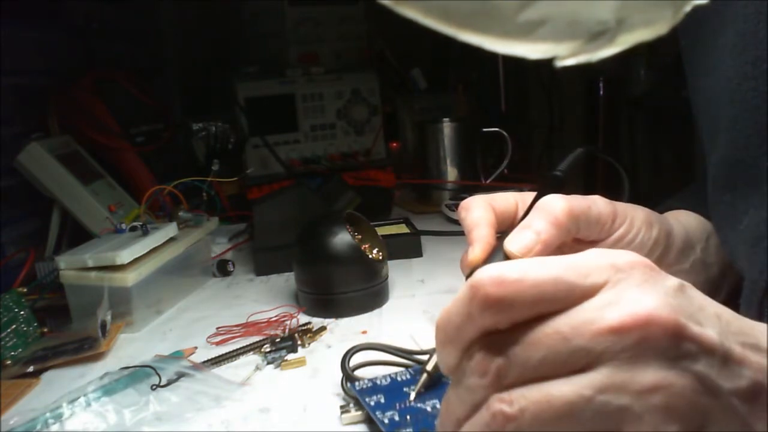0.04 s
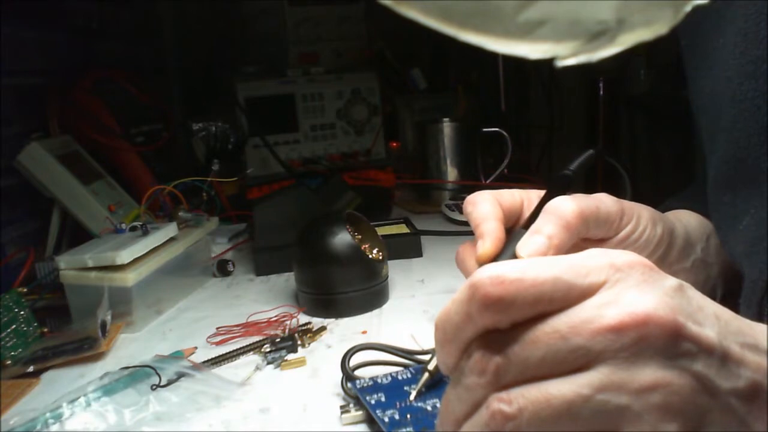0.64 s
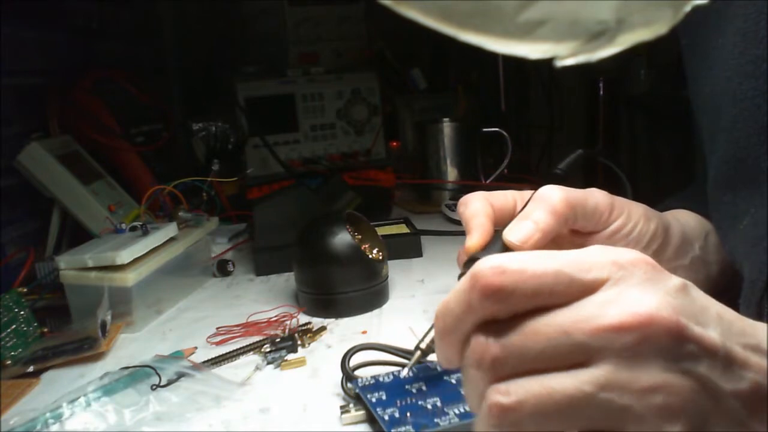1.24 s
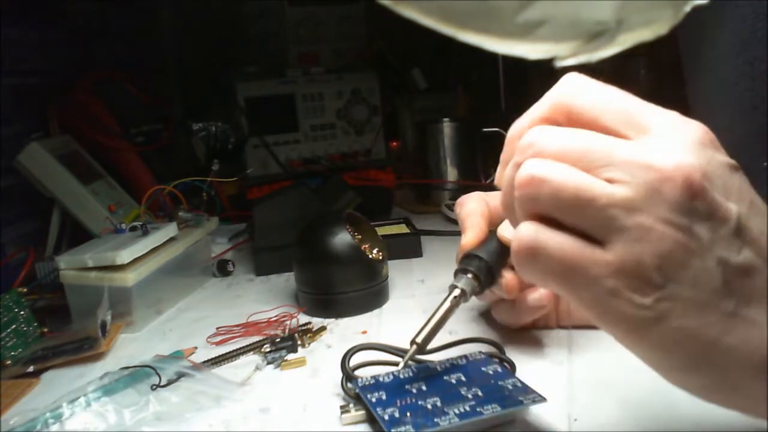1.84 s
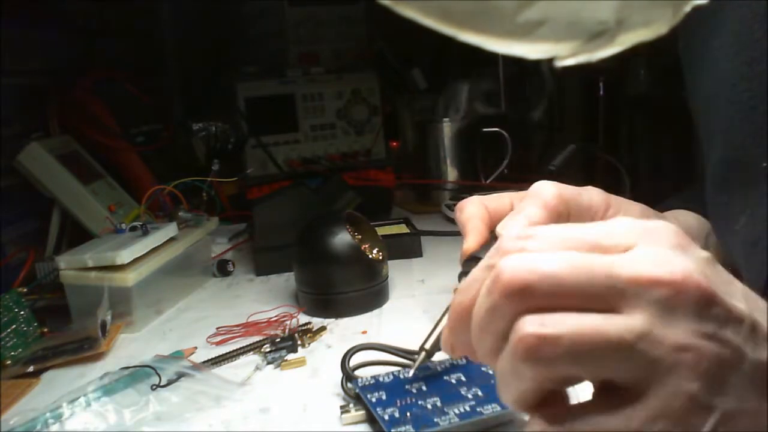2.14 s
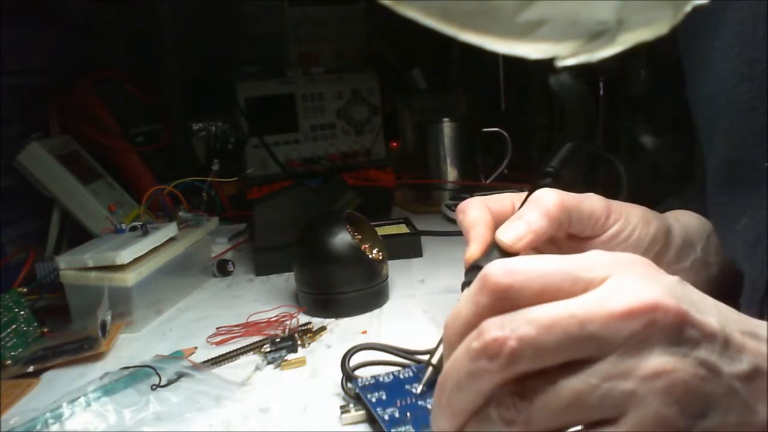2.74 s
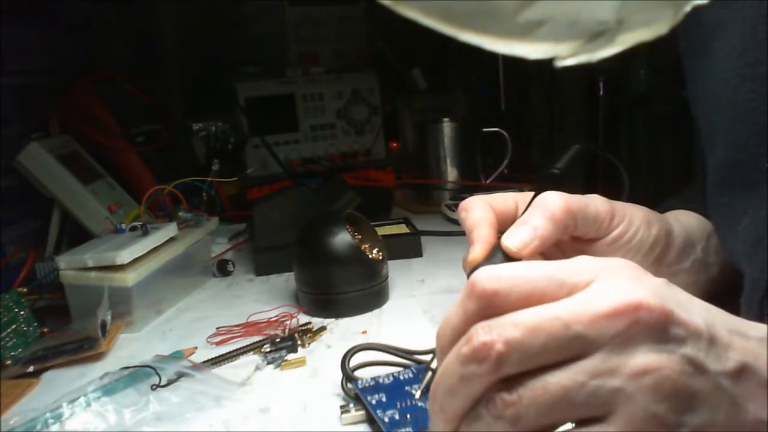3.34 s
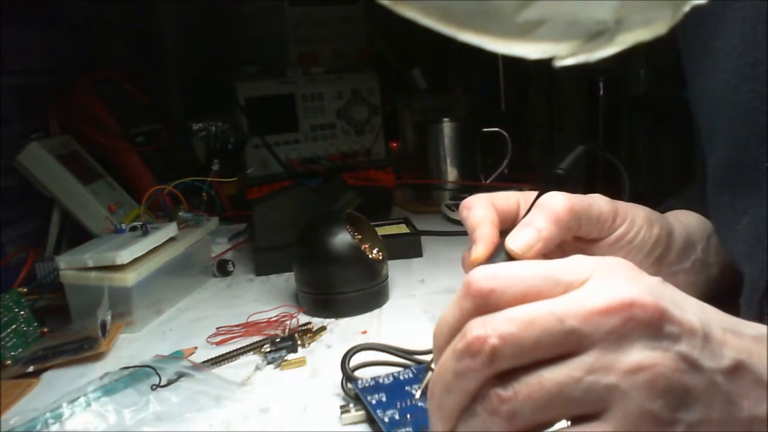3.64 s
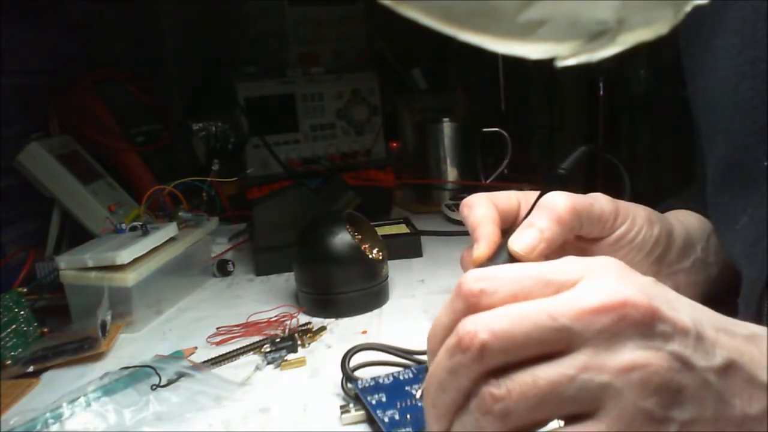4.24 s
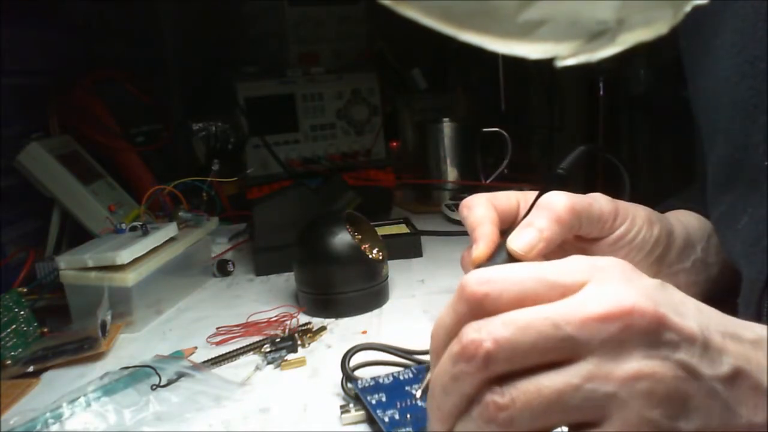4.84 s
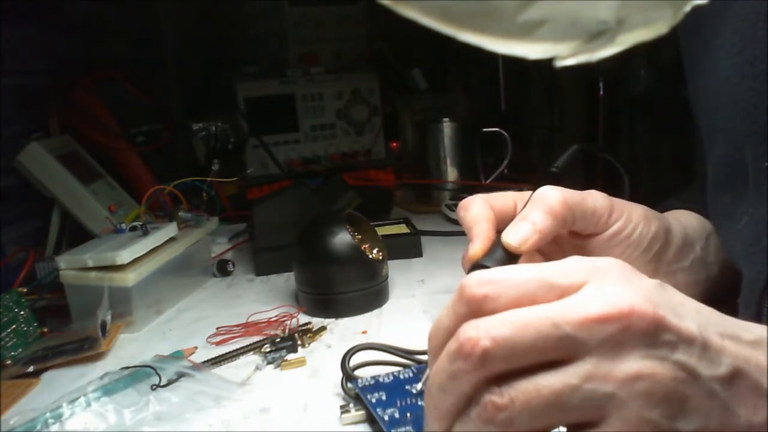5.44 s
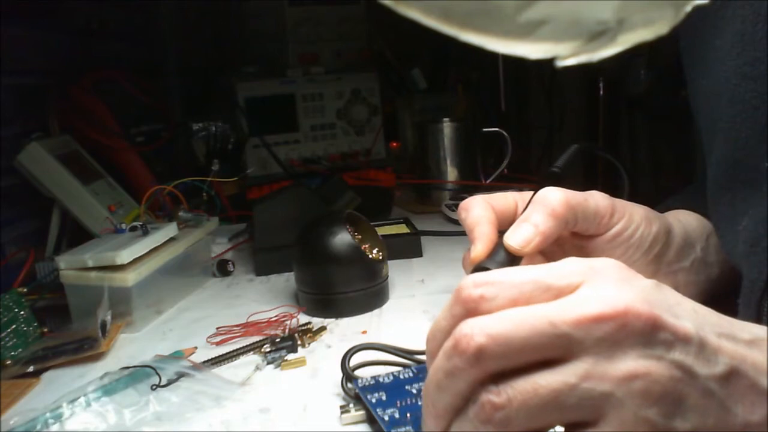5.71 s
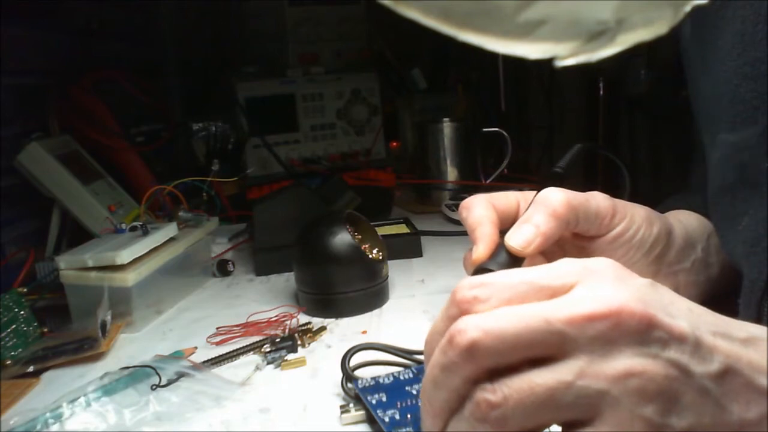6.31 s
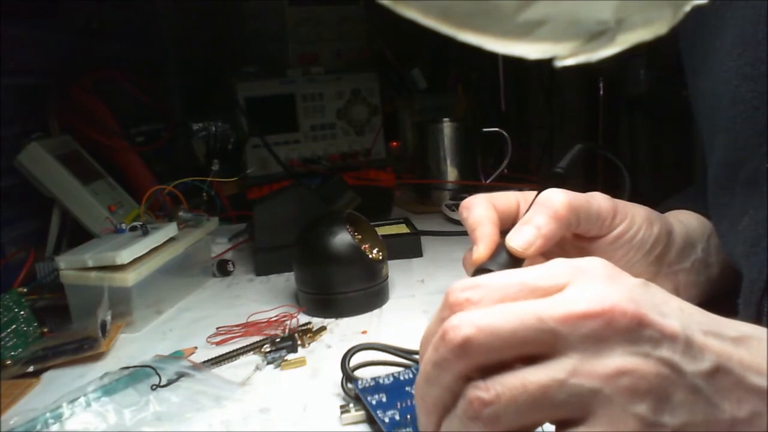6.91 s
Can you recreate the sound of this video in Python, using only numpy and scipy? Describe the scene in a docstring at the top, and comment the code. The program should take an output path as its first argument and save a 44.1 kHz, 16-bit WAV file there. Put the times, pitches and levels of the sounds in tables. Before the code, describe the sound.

A small extractor fan runs throughout at a soldering bench, a dark rush of air with a wavering hum and low rumble. Early on, small parts click, and a hand brushes the bench and bumps it with a dull thud. Afterwards the iron's tip makes faint, brief scrapes and thin squeaks on a circuit board, returning near the end. One close microphone adds a light hiss.

```python
"""A small extractor fan drones over a soldering bench: air roars in its housing, motor and blades hum,
and the unbalanced rotor shakes out a low note that sags. Flux simmers faintly as the joint heats.
The iron's tip sticks and slips on the circuit board in scrapes, squeaks and chirps; small parts tick,
and a hand brushes over the bench and bumps it. One close microphone with a steady hiss."""
import sys
import numpy as np
from scipy import signal
from scipy.fft import rfft, irfft
from scipy.io import wavfile

SR = 44100
rng = np.random.default_rng(int(sys.argv[2]) if len(sys.argv) > 2 else 0)


def log_audio(samples):
    """Write samples as a 16-bit WAV file to the path given in sys.argv[1]."""
    # one column per channel
    frames = np.atleast_2d(samples).T
    # limit to full scale, then quantise
    limited = np.clip(frames, -1, 1)
    pcm = np.round(limited * 32767).astype(np.int16)
    wavfile.write(sys.argv[1], SR, pcm)


N = 316197
TIME = np.arange(N) / SR
FREQS = np.maximum(np.arange(N // 2 + 1) * SR / N, 1)

# The dark roar of air through the fan. Each row: frequency in Hz, relative level in dB.
AIR_SPECTRUM = [(15, -7.5), (60, -0.5), (130, -2), (260, 2.18), (285, -3.5), (346, -3.5), (372, -12.5),
                (645, -13.5), (700, -21.5), (1130, -22), (1480, -29), (2400, -34), (3500, -39),
                (9000, -56.5)]
# Resonances of room, housing and duct. Each row: centre in Hz, width in Hz, lift in dB.
HOUSING_RESONANCES = [(20.5, 11, 13.5), (77.8, 9, 5), (96.2, 7, 4.5), (121.8, 12.6, 7), (158.3, 6.5, 6),
                      (316.4, 10.6, 6.5), (339.2, 12, 4.5), (461, 35, 4), (578, 29, 5), (854, 124, 3.5),
                      (1013, 196, 7.5), (1201, 13, 6.5), (1252, 14, 7), (1318, 28, 10), (1450, 20, 3.5),
                      (1608, 66, 6.5), (1687, 23, 6), (1840, 12, 7.5), (1920, 24, 10), (2095, 59, 6.5),
                      (2210, 19, 9.5), (2360, 22, 3), (2363, 34, 5), (2494, 53, 8), (2950, 70, 4)]
# The 250 Hz hum wavers unevenly in loudness amid the air noise. Each row: time in seconds, gain in dB.
HUM_LEVEL = [(0, -3), (.7, 3.5), (1.35, 5.5), (2.6, -1.5), (3.2, 2), (3.48, -14), (4.17, 9.5), (4.55, -7.5),
             (5.4, -0.5), (5.75, -3), (6, 5), (7.17, -4.5)]
# Loudness of the rotor note. Each row: time in seconds, rms level in dB.
ROTOR_LEVEL = [(0, -42), (.1, -34), (.9, -36), (1.45, -34), (1.65, -44), (1.82, -32.5), (2.05, -38),
               (2.38, -30), (2.6, -33.5), (3.85, -33.5), (4.1, -31), (4.22, -42), (4.35, -33), (4.72, -39),
               (5.1, -41.5), (7.17, -46)]

# Swells of simmering flux. Each row: crest in seconds, length in seconds, level in dB, hiss centre in Hz.
FLUX_SWELLS = [(.17, 0.42, -71, 5450), (.55, 0.49, -67, 5750), (0.872, 0.55, -64, 5270)]
# The thin sizzle of flux. Each row: frequency in Hz, relative level in dB.
FLUX_SPECTRUM = [(2500, -20), (3700, -1), (4500, -8), (5500, -6), (6500, -7), (9000, -22), (15000, -27)]

# The tip scrapes the board; the brief row at 6.551 s is a faint tick. Each row: middle in seconds, length in
# seconds, level in dB, slip rate in Hz.
TIP_SCRAPES = [(1.16, 0.0313, -52, 2063), (3.016, .07, -50, 2150), (3.231, 0.0324, -48, 2190),
               (3.376, 0.0306, -53, 2143), (3.408, .065, -49.5, 2124), (3.447, .025, -56.5, 2081),
               (3.583, 0.0216, -48.5, 2200), (3.634, .035, -49.5, 2195), (3.661, 0.0342, -54.5, 2248),
               (4.027, 0.056, -48, 2182), (4.43, 0.06, -53, 2170), (5.781, 0.049, -55.5, 2190),
               (5.834, 0.0472, -54.5, 2162), (6.551, 0.0138, -55, 2196), (6.909, .034, -45, 2232),
               (6.936, .044, -49.5, 2237), (7.102, .05, -45.5, 2248), (7.149, 0.0277, -55.5, 2197)]
# The bands of a scrape. Each row: multiple of the slip rate, relative level in dB.
SLIP_BANDS = [(1, -1), (1.998, -12), (3.08, 3), (3.9, 0), (5.05, -5.5)]
# Dry grit under a scrape. Each row: frequency in Hz, relative level in dB.
GRIT_SPECTRUM = [(1500, -7), (3000, 0), (4500, -3), (5500, -1), (6500, -3), (7600, 1.5), (9000, -2.5),
                 (12000, -5), (12800, -14), (16000, -30)]
# The board rings under the tip. Each row: centre in Hz, width in Hz, lift in dB.
BOARD_RESONANCES = [(2150, 190, 0), (3190, 110, 10), (4230, 88, 12), (5660, 150, 4), (6440, 230, 4),
                    (7200, 190, 7), (8620, 140, 8), (10100, 240, 12), (11000, 150, 11), (11330, 160, 9),
                    (12150, 160, 11)]

# Small parts and the tool tick. Each row: start in seconds, level in dB, crack t60 in seconds,
# ring pitch in Hz, ring level in dB relative to the tick, ring t60 in seconds.
PART_TICKS = [(1.328, -36, 0.016, 10500, -15, .025), (1.333, -32.5, .02, 3830, -8.5, 0.016),
              (1.433, -36, 0.022, 2980, -18, .014), (1.474, -35, 0.01, 5000, -23, .01),
              (1.479, -33, 0.02, 5550, -23, .012), (1.622, -25.5, 0.0077, 3100, -21, .006),
              (1.669, -34, 0.016, 8800, 0, .012), (1.7195, -28, 0.02, 8400, -6, 0.017),
              (1.805, -34, .008, 5800, -8, .008), (1.9358, -16.5, 0.002, 2000, -3, 0.0024),
              (1.9361, -23, 0.005, 3170, -2, 0.002), (1.969, -38, .007, 8000, -14, .007),
              (1.974, -28.5, 0.0071, 7900, -11, 0.0064), (5.5635, -38.5, .01, 2100, -2, .014),
              (5.5656, -43, 0.017, 3250, 0.5, 0.026)]
# The bright edge of a tick. Each row: frequency in Hz, gain in dB.
TICK_EQ = [(400, -20), (1500, -3), (3200, 0.5), (4200, -3), (5300, 1), (7000, 0), (9300, 0), (10600, -3),
           (11700, -3), (14000, -11), (16000, -24)]

# Hand and sleeve brush the bench. Each row: firmest touch in seconds, length in seconds, level in dB.
HAND_BRUSHES = [(1.643, .05, -51), (1.677, 0.12, -48), (1.714, 0.036, -44), (1.794, 0.13, -44.5),
                (1.93, 0.048, -57), (2.047, 0.1, -48), (2.188, 0.057, -49.5), (2.29, 0.074, -54.5),
                (2.38, 0.052, -58)]
# The rustle of cloth. Each row: frequency in Hz, relative level in dB.
CLOTH_SPECTRUM = [(300, -1), (1000, 5.5), (2000, 3), (3000, 4), (3900, 0.5), (5800, 3.5), (8500, 1.5),
                  (11500, .5), (13500, -4), (16000, -24)]
# The hollow colour of the brushing. Each row: centre in Hz, width in Hz, lift in dB.
CLOTH_RESONANCES = [(1680, 210, 4), (3050, 200, 3.5), (4730, 150, 5), (5650, 400, 4.5), (6100, 200, 2),
                    (7720, 250, 5), (8480, 250, 3), (9400, 280, 5.5)]
# The wrist bumps the bench. Each row: start in seconds, level in dB, pitch in Hz, t60 in seconds.
WRIST_BUMPS = [(1.7263, -21, 75, 0.09), (1.753, -13, 47, 0.05), (1.818, -27, 62, .05)]

# Thin chirps at the edges of a stroke. Each row: middle in seconds, length in seconds, level in dB,
# pitch in Hz, glide in octaves per second.
TIP_CHIRPS = [(2.952, .016, -60, 8900, 14), (2.972, .02, -51, 11100, -1), (2.983, 0.012, -55, 8600, -13),
              (3.664, .012, -56, 7400, 11), (6.896, 0.0086, -48, 11700, -12),
              (6.899, 0.011, -52, 9500, -11)]
# The tip sings where it sticks. Each row: middle in seconds, length in seconds, level in dB,
# pitch in Hz, glide in octaves per second, third partial in dB relative to the first.
TIP_SQUEAKS = [(2.998, 0.036, -50.5, 2230, 0, 3), (3.395, .03, -56, 2130, -.6, -4),
               (4.028, 0.048, -50, 2200, 0, -4), (6.91, 0.034, -52, 2400, -1, -8),
               (7.033, 0.045, -51.5, 2290, .8, -14), (7.104, 0.061, -43, 2350, -1.8, -4)]

# Microphone hiss. Each row: frequency in Hz, relative level in dB.
HISS_SPECTRUM = [(1000, -3), (12000, 0.5), (15500, 3.5)]


def undb(db):
    """Decibels to gain."""
    return 10 ** (np.asarray(db) / 20)


def unit(x):
    """Scale to an rms of one."""
    return x / np.sqrt(np.mean(x ** 2))


def colour(x, points, resonances=()):
    """Filter by a smooth spectrum with resonant humps on top."""
    hz, db = np.transpose(points)
    shape = np.interp(np.log(FREQS), np.log(hz), db)
    for centre, width, lift in resonances:
        shape = shape + lift / (1 + (2 * (FREQS - centre) / width) ** 2)
    return irfft(rfft(x) * undb(shape), N)


def noise(points, resonances=()):
    """Coloured noise with an rms of one."""
    return unit(colour(rng.standard_normal(N), points, resonances))


def walk(rate):
    """Random wander up to about rate turns a second, with an rms of one."""
    return unit(irfft(rfft(rng.standard_normal(N)) * np.exp(-(FREQS / rate) ** 2), N))


def tone(hz):
    """A sine on a moving pitch, with an rms of one."""
    return unit(np.sin(2 * np.pi * np.cumsum(hz) / SR))


def curve(rows):
    """Join (seconds, value) points by straight lines."""
    return np.interp(TIME, *np.transpose(rows))


def decay(t, t60):
    """A tail that falls 60 dB in t60 seconds."""
    return undb(-60 * t / t60)


def swell(s, length, attack_share=.5):
    """A rounded rise to one at time s and a rounded fall."""
    t = (TIME - s) / length
    from_crest = np.maximum(-t / attack_share, t / (1 - attack_share))
    return np.cos(np.pi / 2 * np.clip(from_crest, 0, 1))


def strokes(rows, bend_octaves=0):
    """Pressure envelope and slip rate of short gliding strokes; the rate arches with the pressure."""
    power, weighted_hz = np.zeros((2, N))
    for s, length, db, hz, glide in rows:
        touch = swell(s, length)
        stroke_power = (undb(db) * touch) ** 2
        octaves = glide * np.clip(TIME - s, -length / 2, length / 2) + bend_octaves * (touch - 1)
        power += stroke_power
        weighted_hz += stroke_power * hz * 2 ** octaves
    return np.sqrt(power), weighted_hz / power


def fan(air_db=-32, motor_hz=250.1, motor_db=-43.5, blade_hz=315.5, blade_db=-50.5):
    """Turbulent air fills the housing's resonances; motor and blades each add a hum."""
    air = noise(AIR_SPECTRUM, HOUSING_RESONANCES) * undb(air_db + .82 * walk(33))
    motor = tone(motor_hz * (1 + .002 * walk(2.1)))
    motor *= undb(motor_db + curve(HUM_LEVEL) + 1.1 * walk(2.9))
    blades = tone(blade_hz * (1 + .001994 * walk(1.56)))
    blades *= undb(blade_db + 2.5 * walk(1.6))
    return air + motor + blades


def rotor(start_hz=50.4, creep_hz_per_s=.359, sag_start_s=3.9, sag_hz_per_s=1.8, second_db=-14):
    """An unbalanced rotor shakes the bench once a turn; its note creeps down, then sags as it slows."""
    hz = start_hz - creep_hz_per_s * TIME - sag_hz_per_s * np.maximum(TIME - sag_start_s, 0)
    phase = 2 * np.pi * np.cumsum(hz) / SR
    note = unit(np.sin(phase) + undb(second_db) * np.sin(2 * phase))
    return note * undb(curve(ROTOR_LEVEL) + 1.5 * walk(7.7))


def flux(width_hz=490, lift_db=6, spit_db=3):
    """Tiny bubbles burst in a narrow hiss while the iron rests on the joint."""
    simmer = np.zeros(N)
    for s, length, db, hz in FLUX_SWELLS:
        hiss = noise(FLUX_SPECTRUM, [(hz, width_hz, lift_db)])
        simmer += undb(db) * swell(s, length, attack_share=.62) * hiss
    return simmer * undb(spit_db * walk(120))


def scrapes(glide_octaves_per_s=-.5, roughness=.035, smear_hz=220, grit_db=-3, chatter_db=.5):
    """The tip sticks and slips unevenly as it loses speed: gliding bands over grit ring the board."""
    pressure, hz = strokes([(*row, glide_octaves_per_s) for row in TIP_SCRAPES], bend_octaves=.055)
    phase = 2 * np.pi * np.cumsum(hz * (1 + roughness * walk(59.8))) / SR
    slips = np.zeros(N)
    for k, db in SLIP_BANDS:  # each partial smears into a band that flares on its own
        slips += undb(db) * (walk(smear_hz) * np.sin(k * phase) + walk(smear_hz) * np.cos(k * phase))
    chatter = undb(-chatter_db * walk(71))
    friction = chatter * (unit(slips) + undb(grit_db) * noise(GRIT_SPECTRUM))
    return pressure * unit(colour(friction, [(1, 0)], BOARD_RESONANCES))


def ticks(crack_db=-9, scatter_db=-30, scatter_t60=.22):
    """Each contact snaps, cracks and rings briefly, with a faint scatter off the things on the bench."""
    snaps, cracks, rings = np.zeros((3, N))
    for s, db, crack_t60, hz, ring_db, ring_t60 in PART_TICKS:
        t = TIME[TIME >= s] - s
        start = N - len(t)
        snaps[start] += 2 * undb(db)
        cracks[start:] += undb(db + crack_db) * decay(t, crack_t60)
        cracks[start:] += undb(db + scatter_db) * decay(t, scatter_t60)
        rings[start:] += undb(db + ring_db) * np.sin(2 * np.pi * hz * t) * decay(t, ring_t60)
    return colour(snaps + cracks * rng.standard_normal(N), TICK_EQ) + rings


def hand(scuff_s=1.7192, hold_s=.0064, scuff_t60=.2, scuff_db=-32.5):
    """Cloth and skin catch on the bench in fine grains and scuff as they break free."""
    brush_power = sum((undb(db) * swell(s, length, attack_share=.34)) ** 2
                      for s, length, db in HAND_BRUSHES)
    since_hold = np.maximum(TIME - scuff_s - hold_s, 0)
    scuff = (TIME >= scuff_s) * undb(scuff_db) * decay(since_hold, scuff_t60)
    grains = rng.standard_normal(N) * undb(walk(900) + walk(110))  # fine grain and slower catches
    rustle = unit(colour(grains, CLOTH_SPECTRUM, CLOTH_RESONANCES))
    return rustle * np.sqrt(brush_power + scuff ** 2)


def wrist():
    """The wrist lands on the bench with dull, quickly damped thuds."""
    thuds = np.zeros(N)
    for s, db, hz, t60 in WRIST_BUMPS:
        t = np.maximum(TIME - s, 0)
        thuds -= undb(db) * np.sin(2 * np.pi * hz * t) * decay(t, t60)
    return thuds


def chirps(roughness=.045):
    """A light graze of the tip gives a high, gliding chirp."""
    pressure, hz = strokes(TIP_CHIRPS)
    return pressure * tone(hz * (1 + roughness * walk(592)))


def squeaks(roughness=.028, judder_hz=190, judder_depth=.35, second_db=-15):
    """Steadier slipping of the tip gives a thin, arching note that judders."""
    out = np.zeros(N)
    waver = 1 + roughness * walk(297)
    judder = 1 + judder_depth * tone(judder_hz * (1 + .2 * walk(72.5)))
    for *stroke, third_db in TIP_SQUEAKS:
        pressure, hz = strokes([stroke], bend_octaves=.15)
        first, second, third = (tone(k * hz * waver) for k in (1, 2, 3))
        note = first + undb(second_db) * second + undb(third_db) * third
        out += pressure * unit(judder * note)
    return out


def scene():
    """Everything on the bench, heard from one point."""
    return (fan() + rotor() + flux() + scrapes() + ticks() + hand() + wrist() + chirps() + squeaks())[None]


def record(dry, hiss_db=-59.2, top_hz=15850, dc_offset=-.0228):
    """The microphone adds hiss and a constant offset, and cuts the top."""
    wet = dry + undb(hiss_db) * noise(HISS_SPECTRUM)
    low_pass = signal.ellip(10, .1, 80, top_hz, fs=SR, output="sos")
    return signal.sosfilt(low_pass, wet) + dc_offset


dry = scene()
out = record(dry)
log_audio(out)
```